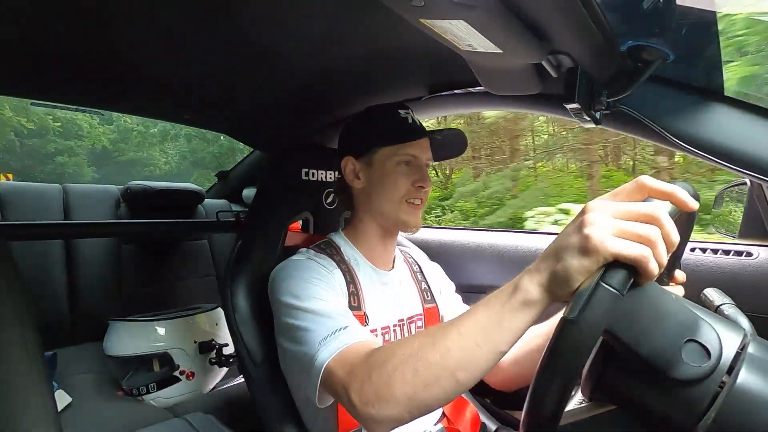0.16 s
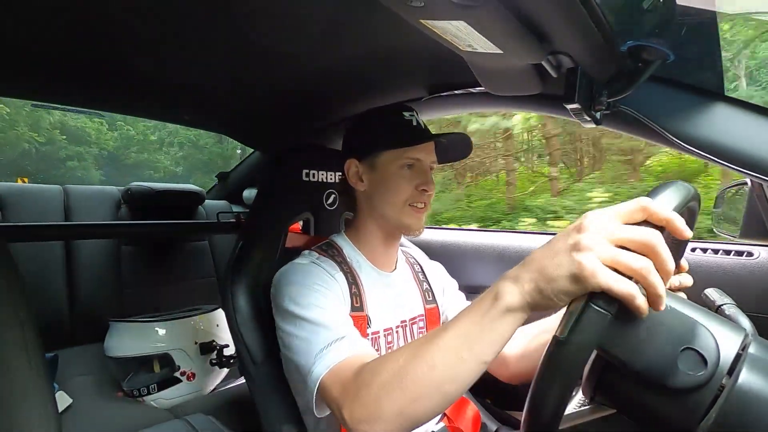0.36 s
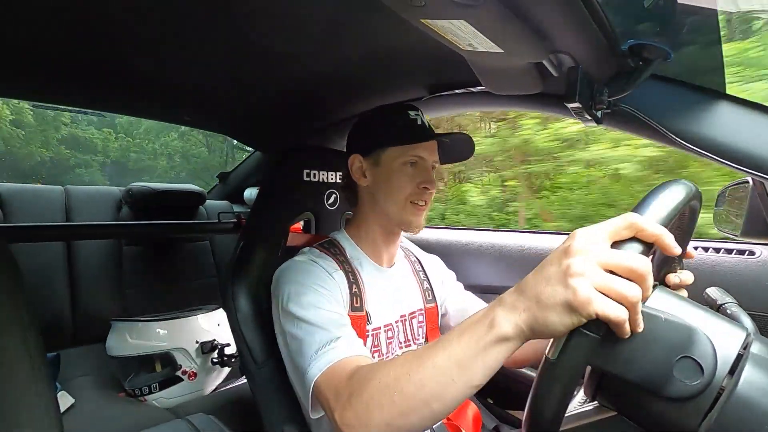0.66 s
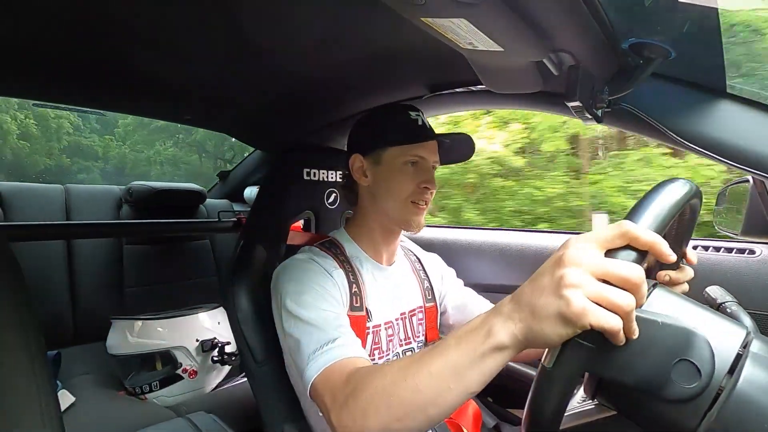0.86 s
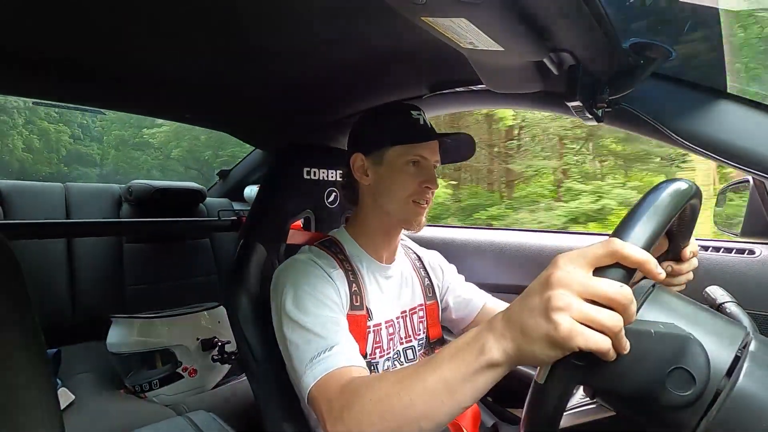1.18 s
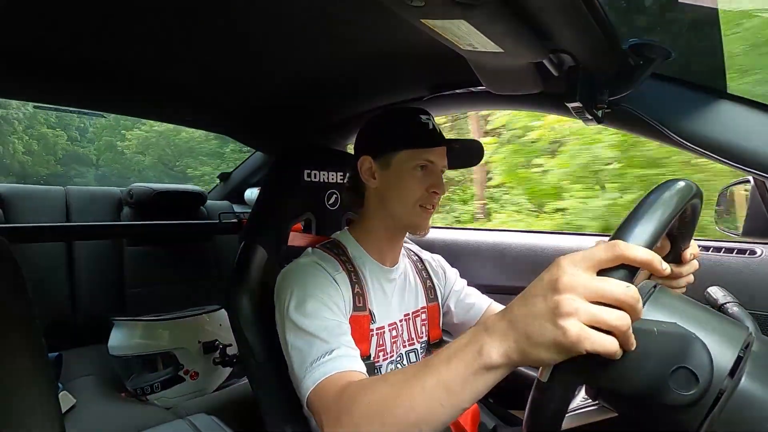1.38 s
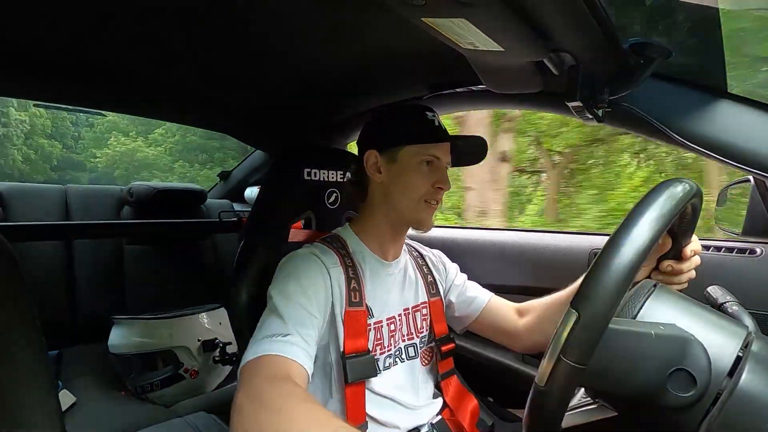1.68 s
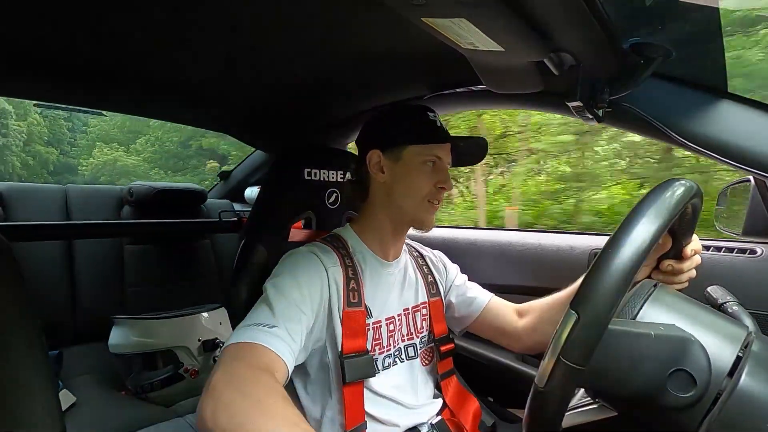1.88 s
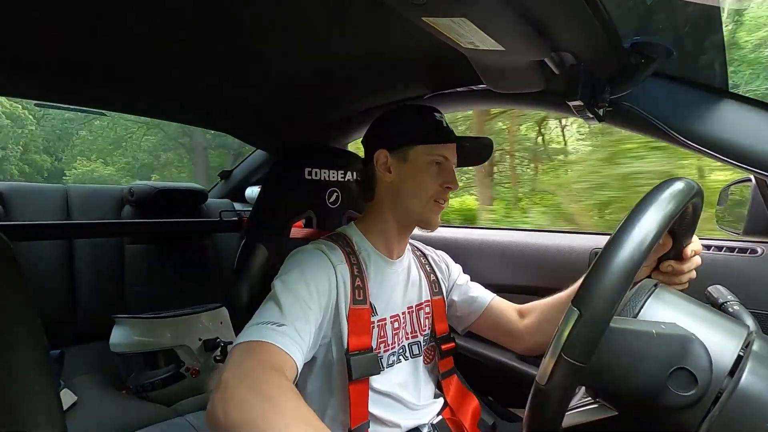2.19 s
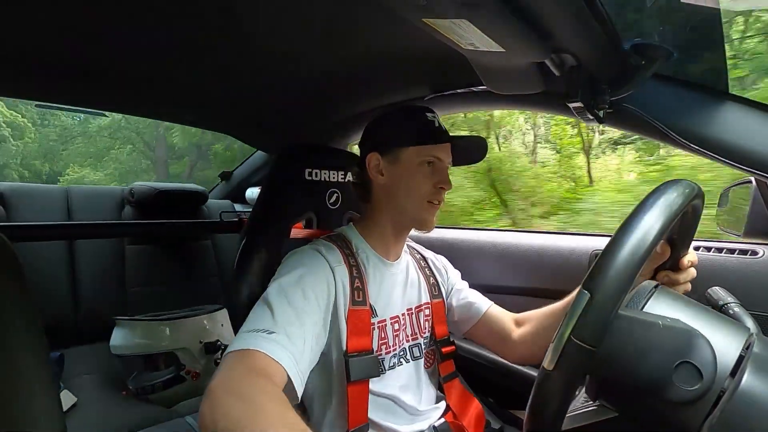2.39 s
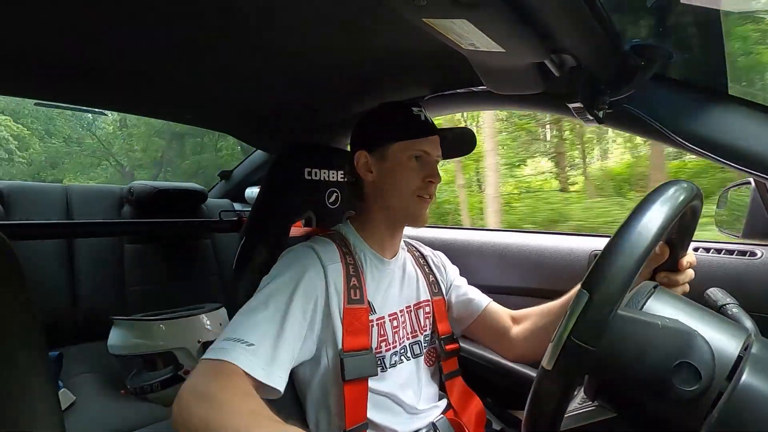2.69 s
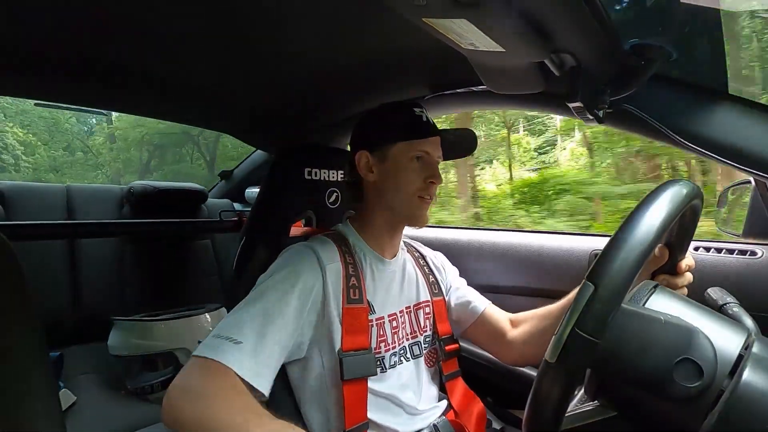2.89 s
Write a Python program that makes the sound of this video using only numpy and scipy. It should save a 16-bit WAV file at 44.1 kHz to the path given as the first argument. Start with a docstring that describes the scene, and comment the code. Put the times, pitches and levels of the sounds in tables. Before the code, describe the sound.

A V8 engine throbs at part throttle, opens into a full raspy roar with rising pitch, then drops back as the driver lifts; heard inside the closed cabin with a microphone near the driver.

```python
"""V8 pull and lift-off

Inside a car, a V8 pulls from part throttle to full load, then the driver lifts off for a gear change.
Tones at whole multiples (orders) of the four-stroke cycle rate are shaped by a booming pipe and cabin.
Shaped noise makes the rest: turbulent roar, exhaust rasp and intake rush that pulse with the engine,
a panel buzz that comes up around lift-off, hissing wind and a rumbling road.
"""
import sys
import numpy as np
from scipy import signal
from scipy.fft import rfft, irfft, next_fast_len
from scipy.io import wavfile
from scipy.ndimage import uniform_filter1d, map_coordinates

SR = 44100
rng = np.random.default_rng(int(sys.argv[2]) if len(sys.argv) > 2 else 0)


def file_out(sig):
    """Save sig as 16-bit WAV at sys.argv[1]."""
    # one column per channel
    cols = np.atleast_2d(sig).T
    # limit, then scale
    lim = np.clip(cols, -1, 1)
    pcm = np.round(lim * 32767).astype(np.int16)
    wavfile.write(sys.argv[1], SR, pcm)


def boost_factor(decibels):
    """Convert a level in decibels to a linear amplitude factor."""
    exponent = np.asarray(decibels, float) / 20
    return 10 ** exponent


N = 134505  # length in samples


def unit(x):
    """Scales a signal to rms 1."""
    return x / np.sqrt(np.mean(x ** 2) + 1e-20)


def along(points, hz):
    """Reads (Hz, value) points on a log frequency axis."""
    f, v = np.transpose(points)
    return np.interp(np.log(hz + 1), np.log(f + 1), v)


def curves(rows):
    """Gives one value per sample for each column after the time."""
    s, *cols = np.transpose(rows)
    return [np.interp(np.arange(N) / SR, s, c) for c in cols]


def wobble(rate):
    """Joins random values with straight lines, rate values a second (40 at most)."""
    values = rng.standard_normal(int(N * 40 / SR) + 4)
    position = np.arange(N) * min(rate, 40) / SR
    return map_coordinates(values, [position], order=1)


def rush(gain, patchy_db):
    """Makes noise of rms 1, patchy in time and pitch, coloured by gain, a function of Hz."""
    z = signal.stft(rng.standard_normal(N), nperseg=512)[2]
    patches = uniform_filter1d(rng.standard_normal(z.shape), 6, 0)  # smooth over pitch
    patches = uniform_filter1d(patches, 12, 1)  # smooth over time
    patchy = signal.istft(z * boost_factor(patchy_db * unit(patches)), nperseg=512)[1][:N]
    size = next_fast_len(N + 8192)
    spectrum = rfft(patchy, size) * gain(np.fft.rfftfreq(size, 1 / SR))
    return unit(irfft(spectrum, size)[:N])


def coloured_rush(points, patchy_db):
    """Makes patchy noise whose colour follows (Hz, dB) points."""
    return rush(lambda hz: boost_factor(along(points, hz)), patchy_db)


def by_load(load, values):
    """Blends a value between the engine states."""
    return np.interp(load, np.arange(len(values)), values)


# Strength of each engine tone before the cabin shapes it. Each row: order of the cycle, then level in dB
# at part throttle, throttle opening, full load, full load near peak revs, and lifted off.
ORDER_LEVELS = [(2, -38, -37, -33, -34, -34), (3, -29, -28, -27, -44, -31), (4, -45, -38, -36, -28, -31),
                (5, -28, -26, -29, -27, -33), (6, -26, -29, -36, -45, -36), (7, -40, -47, -39, -31, -43),
                (8, -36, -35, -26, -20, -29), (9, -43, -35, -33, -30, -38), (10, -43, -41, -33, -32, -39),
                (11, -33, -24, -34, -39, -40), (12, -48, -38, -37, -35, -44), (13, -31, -26, -37, -33, -39),
                (14, -43, -38, -31, -34, -42), (15, -36, -32, -30, -28, -39), (16, -23, -24, -23, -31, -36),
                (17, -41, -24, -29, -45, -41), (18, -36, -33, -35, -45, -42), (19, -46, -38, -39, -29, -45),
                (20, -38, -30, -32, -33, -43), (21, -37, -31, -37, -33, -41), (22, -44, -27, -38, -33, -42),
                (23, -32, -34, -29, -30, -43), (24, -38, -25, -32, -37, -39), (25, -37, -32, -27, -38, -40),
                (26, -43, -36, -35, -33, -38), (27, -41, -35, -35, -31, -40), (28, -36, -28, -25, -33, -39),
                (29, -37, -32, -28, -39, -46), (30, -38, -33, -27, -39, -41), (31, -35, -35, -29, -39, -41),
                (32, -32, -33, -35, -37, -40), (33, -33, -30, -32, -40, -38), (34, -38, -33, -37, -39, -41)]
# How pipe and cabin boost or weaken the engine tones. Each row: frequency in Hz, gain in dB.
CABIN_RESPONSE = [(50, -11), (100, -9.5), (115, 4.5), (130, 15), (150, 8), (175, 10), (200, 9.5),
                  (215, 10.5), (230, 4), (245, 9), (260, 11.5), (300, 6.5), (340, -0.5), (370, -6),
                  (400, 1), (430, -1.5), (460, -4.5), (490, -1.5), (520, 3), (560, 1), (600, -1),
                  (650, -4.5), (700, -1.5), (760, -7.5), (830, -9.5), (900, -16.5), (1000, -21.5),
                  (1100, -21.5), (1350, -17)]
# Around and after lift-off the strongest orders swell and sink on their own; cabin included.
# Each row: time in seconds, level in dB rms of orders 3, 4, 5, 6, 8 and 15.
COASTING_LEVELS = [(2.46,-40,-12,-18,-38,-22.5,-33), (2.51,-45,-34,-13,-18.5,-16.5,-26),
                   (2.54,-36,-34,-14.5,-35,-38,-30), (2.568,-18.5,-14.5,-33,-37,-15.5,-46),
                   (2.6,-23,-24.5,-22,-51,-22.5,-40.5), (2.65,-25,-39,-19,-26,-23.5,-40),
                   (2.685,-34,-11.5,-22,-26,-18,-20), (2.71,-36,-42,-19,-21,-28,-41),
                   (2.74,-31,-19,-20,-30,-21,-28), (2.78,-35,-17,-24,-26,-20.5,-42),
                   (2.85,-28,-18.5,-31,-25,-18.5,-28), (2.92,-41,-20,-19,-20.5,-17.5,-31),
                   (2.97,-34,-19,-23,-35,-19,-29), (3.03,-35,-22,-18,-27,-33,-43)]


def engine(rate, cycle, load):
    """Adds a tone for each order of the cycle, shaped by load and cabin; higher orders are less steady."""
    # unsteadiness in the five engine states, later grown by the square root of the order
    uneven_db, uneven_rad = (.25, .45, .35, .35, 1.4), (.06, .1, .08, .08, .3)
    uneven_rate = 20  # random values a second
    drift_db, drift_rad = .1, .05  # slow level and phase drift, later multiplied by the order
    in_step_orders = (5, 6)  # start without a random phase, so they throb together in the opening
    coasting = dict(zip((3, 4, 5, 6, 8, 15), curves(COASTING_LEVELS)))
    lifted = np.arange(N) / SR > COASTING_LEVELS[0][0]
    lifted = uniform_filter1d(lifted * 1.0, size=SR // 25)  # crossfade over 40 ms
    out = np.zeros(N)
    for k, *levels in ORDER_LEVELS:
        k = round(k)
        level_db = by_load(load, levels) + along(CABIN_RESPONSE, k * rate)
        level_db += np.sqrt(k) * by_load(load, uneven_db) * wobble(uneven_rate)
        level_db += k * drift_db * wobble(4.28)
        if k in coasting:
            level_db = level_db * (1 - lifted) + coasting[k] * lifted
        phase = 2 * np.pi * rng.random() * (k not in in_step_orders)
        phase = phase + k * drift_rad * wobble(2.975)
        phase += np.sqrt(k) * by_load(load, uneven_rad) * wobble(uneven_rate)
        out += np.sqrt(2) * boost_factor(level_db) * np.sin(k * cycle + phase)
    return out


# Colour of the turbulent roar. Each row: frequency in Hz, relative level in dB.
ROAR_COLOUR = [(30, -52), (60, -19), (95, -7), (150, -3), (300, 1.5), (420, -6), (600, -1), (800, -10),
               (1100, -11.5), (1500, -26), (2500, -100)]


def roar(level_db):
    """Turbulent gas gives low noise that fills the gaps between the engine tones."""
    return boost_factor(level_db) * coloured_rush(ROAR_COLOUR, patchy_db=1.2)


def gas_pulse(cycle):
    """Swings the gas noise level, in dB, once a crank turn and once a firing (eight a cycle)."""
    return 1.5 * np.cos(2 * cycle) + 1.0 * np.cos(8 * cycle)


# Colour of the exhaust rasp. Each row: frequency in Hz, relative level in dB.
RASP_COLOUR = [(300, -63), (900, -9.5), (1200, -4), (1340, -6.5), (1460, -1.5), (1900, -1.5), (2300, -9),
               (3000, -18.5), (5000, -36.5), (9000, -100)]


def exhaust_rasp(level_db, pulse_db):
    """Exhaust gas rasps as mid-pitched noise that pulses with the engine."""
    return boost_factor(level_db + pulse_db) * coloured_rush(RASP_COLOUR, patchy_db=.9)


# Colour of the intake rush. Each row: frequency in Hz, relative level in dB.
INTAKE_COLOUR = [(800, -58), (1800, -6.5), (2500, -0.5), (3500, -1.5), (4600, -15.5), (5600, -18.5),
                 (8000, -37), (12000, -100)]


def intake_rush(level_db, pulse_db):
    """Air drawn into the engine rushes as brighter noise with the same pulse as the rasp."""
    return boost_factor(level_db + pulse_db) * coloured_rush(INTAKE_COLOUR, patchy_db=.9)


def panel_buzz(level_db, cycle):
    """A buzzing panel is noise around one resonance, swinging once a crank turn."""
    centre_hz, width_hz, pulse_db = 2250, 750, 3

    def resonance(hz):
        return 1 / (1 + ((hz - centre_hz) / (width_hz / 2)) ** 2) ** 2

    swing_db = pulse_db * np.cos(2 * cycle) + 2.2 * wobble(15)
    return boost_factor(level_db + swing_db) * rush(resonance, patchy_db=1.3)


# Colour of the wind hiss. Each row: frequency in Hz, relative level in dB.
HISS_COLOUR = [(1000, -67), (2500, -5.5), (4000, 1.5), (5200, -4), (6400, -4.5), (7500, -9.5), (10000, -16),
               (12000, -23), (13200, -27.5), (14500, -38.5), (16000, -63), (20000, -110)]


def wind_hiss(level_db, flutter_db):
    """Air passing the car hisses as high noise with a quick flutter."""
    return boost_factor(level_db + flutter_db) * coloured_rush(HISS_COLOUR, patchy_db=1.1)


# Colour of the road rumble. Each row: frequency in Hz, relative level in dB.
RUMBLE_COLOUR = [(5, -18), (15, -9), (24, -6), (34, -1), (46, 4.2), (56, -7), (70, -13.5), (100, -14),
                 (140, -27), (300, -100)]


def road_rumble(level_db):
    """The rolling car rumbles as very low noise with an uneven level."""
    return boost_factor(level_db + 1.8 * wobble(6)) * coloured_rush(RUMBLE_COLOUR, patchy_db=.3)


# Levels of the noises before pulses and flutter. Each row: time in seconds, then level in dB of
# turbulent roar, exhaust rasp, intake rush, wind hiss, panel buzz and road rumble.
NOISE_LEVELS = [(.05, -34.5, -47, -58, -59, -74, -46), (.25, -28, -44, -61, -59.5, -70, -43),
                (.45, -29, -43, -54.5, -59, -64, -50), (.58, -31, -41, -50, -62.5, -71, -43),
                (.67, -25.5, -34.5, -42.5, -54, -73, -61), (.76, -25.5, -33.5, -35.5, -49, -62.5, -61),
                (.95, -23.5, -36, -37.5, -48, -77, -34.5), (1.2, -26.5, -35.5, -39, -47.5, -78, -57),
                (1.5, -34, -36.5, -39.5, -47.5, -63, -41), (1.72, -24.5, -35.5, -36.5, -45, -76, -44),
                (1.95, -34, -36.5, -41, -48, -57, -45), (2.15, -28.5, -39, -41, -48, -56.5, -38),
                (2.33, -25.5, -36, -39.5, -46.5, -42, -44), (2.55, -28, -40.5, -39, -44.5, -44, -55),
                (2.72, -31.5, -40.5, -39.5, -42, -40, -32), (2.85, -34.5, -39, -40, -40, -35.5, -43),
                (2.96, -30.5, -38.5, -42, -40.5, -37, -33), (3.04, -35, -37, -39, -40, -38, -26)]


def noises(cycle):
    """Adds the engine's noises, the panel buzz, and the wind and road noise of the moving car."""
    roar_db, rasp_db, intake_db, hiss_db, buzz_db, road_db = curves(NOISE_LEVELS)
    flutter_db = .7 * wobble(25.03)  # quick flutter shared by rasp, intake and wind
    pulse_db = flutter_db + gas_pulse(cycle)
    gas = roar(roar_db) + exhaust_rasp(rasp_db, pulse_db) + intake_rush(intake_db, pulse_db)
    return gas + panel_buzz(buzz_db, cycle) + wind_hiss(hiss_db, flutter_db) + road_rumble(road_db)


# Engine speed. Each row: time in seconds, cycle rate in Hz (half the crank rate).
ENGINE_SPEED = [(0.02, 28.15), (0.28, 28.79), (0.49, 29.23), (0.65, 30.45), (0.77, 30.2), (0.87, 31.38),
                (1.35, 33.79), (1.46, 34.51), (1.8, 36.71), (2.14, 38.34), (2.3, 39.61), (2.36, 40.04),
                (2.47, 38.61), (2.55, 38.74), (2.79, 36), (2.85, 35.93), (2.95, 33.85), (3.03, 33.5)]
# Each row: time in seconds, engine state (0 part throttle, 1 throttle opening, 2 full load,
# 3 full load near peak revs, 4 lifted off).
ENGINE_LOAD = [(0, 0), (.3, 0), (.62, 1), (.95, 2), (2.3, 3), (2.5, 3), (2.57, 4), (3.05, 4)]


def scene():
    """Adds engine tones and noises as heard at one microphone."""
    (rate,), (load,) = curves(ENGINE_SPEED), curves(ENGINE_LOAD)
    start_s = .031  # the cycle angle is zero about here, which times the opening throb
    cycle = 2 * np.pi * (np.cumsum(rate) / SR - rate[0] * start_s)  # angle in radians
    return (engine(rate, cycle, load) + noises(cycle))[None]


def low_pass(x):
    """Removes everything above the highest recorded frequency."""
    return signal.sosfilt(signal.butter(12, 15590, fs=SR, output="sos"), x)


def record(dry):
    """Turns the finished mix into the sound that is saved."""
    return low_pass(dry)


dry = scene()
out = record(dry)
file_out(out)
```